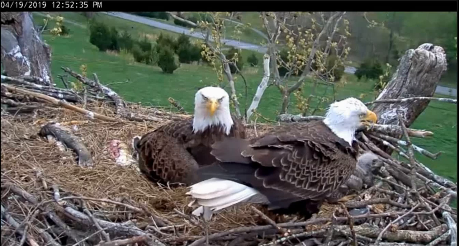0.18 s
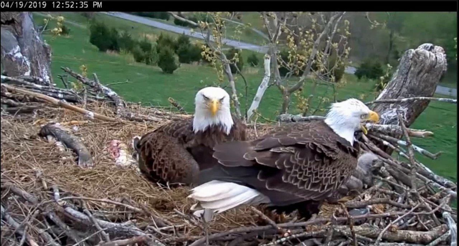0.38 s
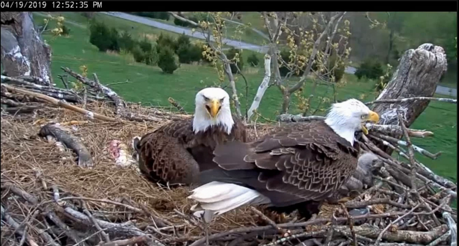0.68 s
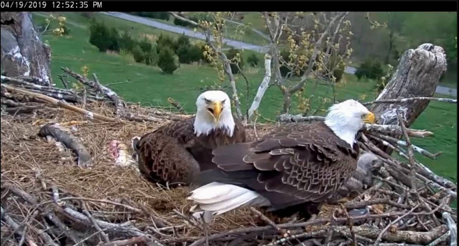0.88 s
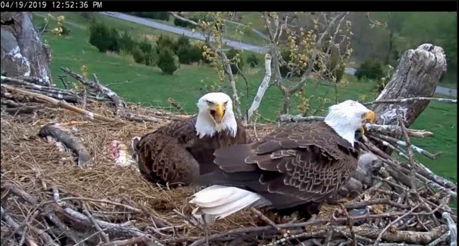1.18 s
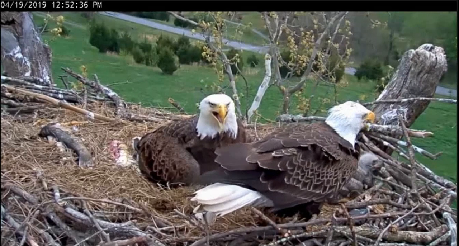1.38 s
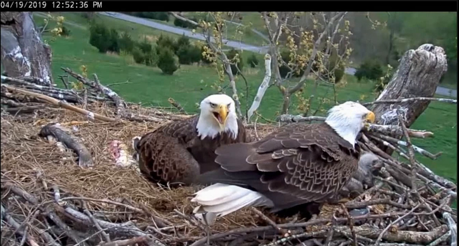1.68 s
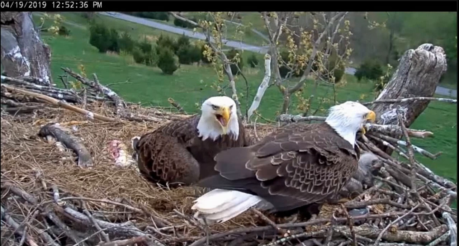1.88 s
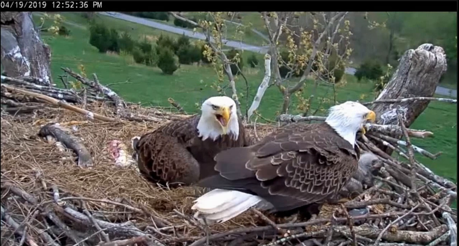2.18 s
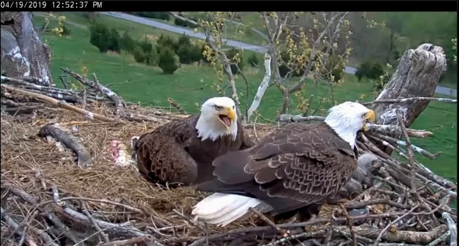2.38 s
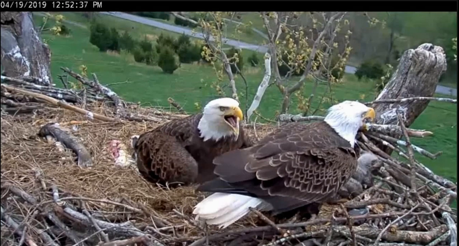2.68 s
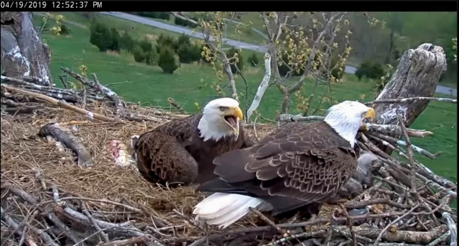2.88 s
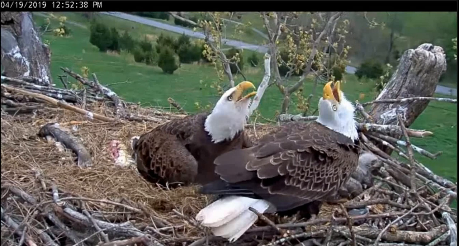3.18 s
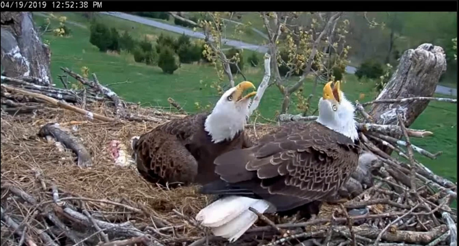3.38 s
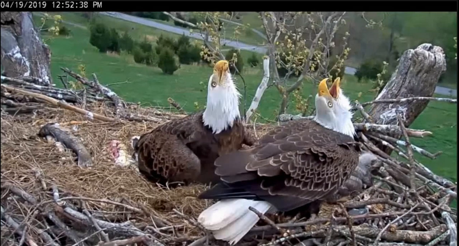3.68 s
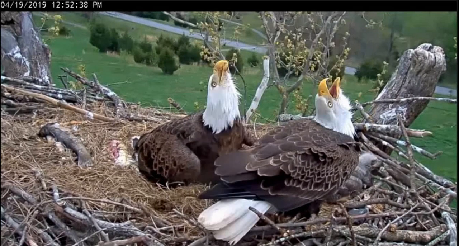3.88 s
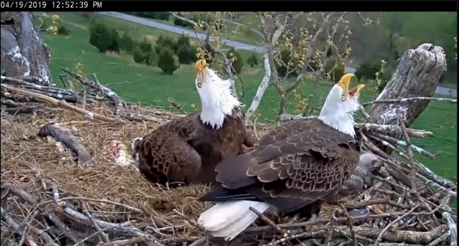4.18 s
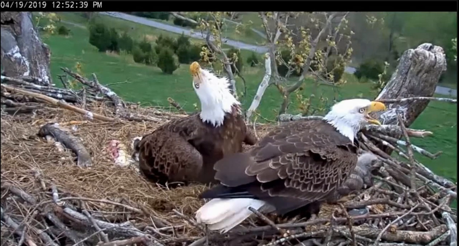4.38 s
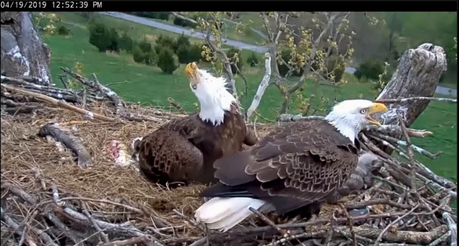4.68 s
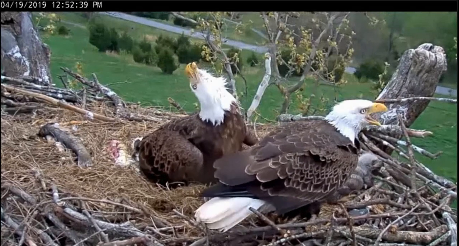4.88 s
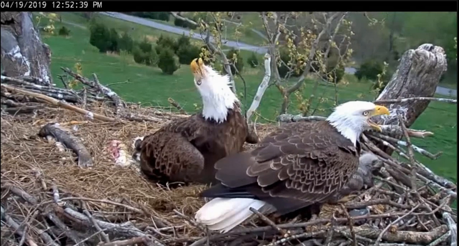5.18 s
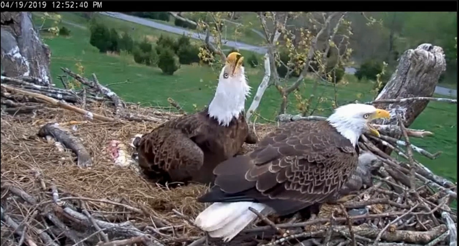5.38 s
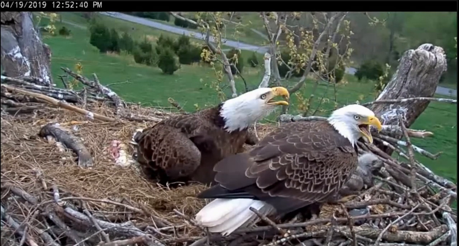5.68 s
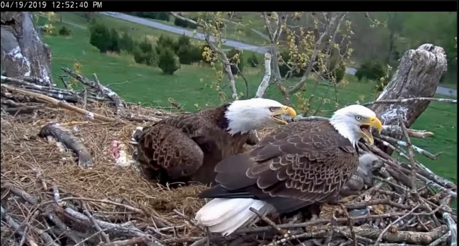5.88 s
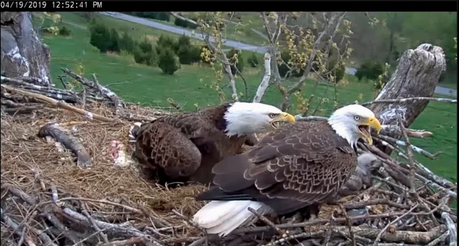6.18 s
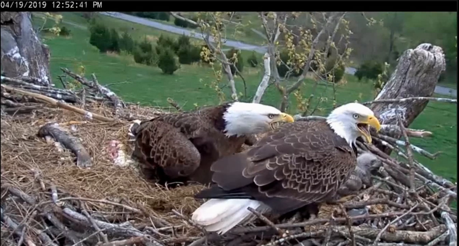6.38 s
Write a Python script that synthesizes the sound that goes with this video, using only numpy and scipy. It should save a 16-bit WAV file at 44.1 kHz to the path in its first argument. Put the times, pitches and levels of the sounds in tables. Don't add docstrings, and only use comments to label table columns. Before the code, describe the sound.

High, trembling eagle whistles and squeaky chirp runs over thudding wind on an outdoor microphone, with a small songbird whistling faintly far off.

```python
import sys
import numpy as np
from scipy import signal
from scipy.fft import rfft, irfft
from scipy.io import wavfile
from scipy.ndimage import uniform_filter1d

SR = 44100
rng = np.random.default_rng(int(sys.argv[2]) if len(sys.argv) > 2 else 0)


def boost(x):
    u = np.asarray(x, float) / 20
    return 10 ** u


def wrap_up_sound(samples):
    columns = np.atleast_2d(samples).T
    tamed = np.clip(columns, -1, 1)
    steps = np.round(tamed * 32767).astype(np.int16)
    wavfile.write(sys.argv[1], SR, steps)


N = 289296


def evened(x):
    return x / np.sqrt(np.mean(abs(x) ** 2) + 1e-20)


def add(mix, s, sound):
    part = mix[round(s * SR):][:len(sound)]
    part += sound[:len(part)]


def wobble(count, width_hz):
    r = np.exp(-np.pi * width_hz / SR)
    z = rng.standard_normal(count + 900) + 1j * rng.standard_normal(count + 900)
    for _ in range(3):
        z = signal.lfilter([1], [1, -r], z)
    return evened(z[900:])


def note(rows, rough, width_hz, climb, rattle):
    s, hz, *levels_db = np.transpose(rows)
    t = np.arange(s[0], s[-1], 1 / SR)
    smooth_hz = uniform_filter1d(np.interp(t, s, hz), size=400)
    turn = 2 * np.pi * np.cumsum(smooth_hz) / SR
    sound = np.zeros(len(t))
    for k, db in enumerate(levels_db, 1):
        share = np.clip(rough * k ** climb, 0, .9)
        shake = np.sqrt(1 - share ** 2) + share * wobble(len(t), width_hz * k ** .3)
        sound += np.sqrt(2) * boost(np.interp(t, s, db)) * (shake * np.exp(1j * k * turn)).real
    sound *= np.sqrt(1 - rattle ** 2) + rattle * wobble(len(t), 300).real * np.sqrt(2)
    return s[0], sound * signal.windows.tukey(len(t), min(1, .012 * SR / len(t)))


def sing(notes, **membrane):
    out = np.zeros(N)
    for rows in notes:
        add(out, *note(rows, **membrane))
    return out


def shaped(fade_db, s, length, start_hz, end_hz, *levels_db):
    db = np.array(levels_db)
    end = s + length
    middle_hz = .503 * (start_hz + end_hz)
    return [(s - .014, start_hz, *(db - 35)),
            (s - .001, start_hz, *(db - 23.0)),
            (s + 0.0038, start_hz, *(db + 1.0)),
            (s + 0.5 * length + 0.0027, middle_hz, *(db + 0.5 + 0.45 * fade_db)),
            (end - .002, .992 * end_hz, *(db - 3.5 + fade_db)),
            (end + 0.004, .985 * end_hz, *(db - 21.5)),
            (end + 0.029, .97 * end_hz, *(db - 30.0))]


def sing_short(rows, fade_db, rough, width_hz, rattle):
    notes = [shaped(fade_db, *row) for row in rows]
    return sing(notes, rough=rough, width_hz=width_hz, climb=.4, rattle=rattle)


def whistles():
    # (time [s], pitch [Hz], level [dB], second partial against the first [dB])
    whistle_tables = [
        [(.09, 2583, -43, 1), (.099, 2510, -24, -1), (.125, 2584, -19, -6.5), (.146, 2615, -21.5, -7),
         (.17, 2540, -23.5, -1.5), (.197, 2320, -24.5, -17), (.225, 2484, -19.5, -7), (.262, 2415, -28, -7),
         (.28, 2210, -59.5, 3)],
        [(.57, 2460, -37, -14), (.578, 2458, -21, -5.5), (.605, 2598, -20, -4.5), (.635, 2406, -25.5, -8.5),
         (.655, 2350, -39.5, -14.5), (.668, 2320, -55.5, 1)],
    ]
    notes = []
    for rows in whistle_tables:
        points = []
        for s, hz, db, bright_db in rows:
            third_db = db + 0.73 * bright_db - 17.5 - 0.0018 * max(hz - 2520, 0)
            points.append((s, hz, db, db + bright_db, third_db))
        notes.append(points)
    return sing(notes, rough=.21, width_hz=470, climb=1.05, rattle=.05)


def warble():
    # (time [s], pitch [Hz], level [dB], second partial against the first [dB])
    warble_points = [
        (6.028, 2540, -39, -1.5),
        (6.04, 2860, -30, -23),
        (6.066, 2840, -31, -8.5),
        (6.086, 2970, -27, -2.5),
        (6.117, 2904, -34.5, -7.5),
        (6.149, 2600, -62, 2),
    ]
    points = [(s, hz, db, db + bright_db) for s, hz, db, bright_db in warble_points]
    return sing([points], rough=.5, width_hz=380, climb=.4, rattle=.15)


def yelps():
    # (time [s], length [s], pitch [Hz], level [dB], third partial against the first [dB])
    yelp_rows = [
        (0.076, .022, 1556, -37, -4.5),
        (0.555, 0.019, 1534, -33, -19.5),
        (0.888, 0.014, 1518, -41.5, -6.5),
    ]
    rows = [(s, length, .92 * hz, 1.05 * hz, db, db + 0.5, db + third_db)
            for s, length, hz, db, third_db in yelp_rows]
    return sing_short(rows, fade_db=0, rough=.5, width_hz=450, rattle=.3)


def grunts_and_chups():
    # (time [s], length [s], pitch [Hz], level [dB], second partial against the first [dB])
    grunt_rows = [
        (1.206, 0.031, 1072, -38, -14),
        (1.455, 0.017, 1078, -42.5, -13),
        (4.719, 0.013, 2044, -36, -24.5),
    ]
    # (time [s], length [s], pitch [Hz], level [dB], third partial against the first [dB])
    chup_rows = [(1.218, 0.043, 2170, -39, -21), (1.582, 0.023, 2080, -40.5, -23),
                 (1.938, 0.041, 2174, -41, -14.5), (2.206, 0.041, 2204, -41.5, -8.5),
                 (2.45, 0.043, 2220, -43, -8.5), (4.814, 0.032, 2116, -42, -9),
                 (4.895, 0.028, 2140, -40, -7.5), (6.484, 0.027, 2160, -39.5, -26)]
    rows = [(s, length, hz, hz, db, db + second_db, db - 18)
            for s, length, hz, db, second_db in grunt_rows]
    rows += [(s, length, 1.06 * hz, .98 * hz, db, db - 9, db + third_db)
             for s, length, hz, db, third_db in chup_rows]
    return sing_short(rows, fade_db=-7, rough=.72, width_hz=620, rattle=.35)


def pips():
    # (time [s], length [s], start pitch [Hz], end pitch [Hz], level [dB])
    pip_rows = [
        (2.685, 0.027, 2570, 2610, -40.5),
        (2.931, 0.038, 2560, 2580, -40),
        (3.185, 0.023, 2650, 2610, -34.5),
        (3.203, 0.016, 2950, 2784, -35.5),
    ]
    rows = [(*row, row[-1] - 14.5) for row in pip_rows]
    return sing_short(rows, fade_db=-5, rough=.78, width_hz=800, rattle=.35)


def peeps():
    # (time [s], length [s], start pitch [Hz], end pitch [Hz], level [dB])
    peep_rows = [
        (.684, 0.031, 2475, 2490, -25.5),
        (0.899, 0.024, 2284, 2600, -24),
        (4.389, .065, 2433, 2166, -37.5),
    ]
    rows = [(*row, row[-1] - 13) for row in peep_rows]
    return sing_short(rows, fade_db=0, rough=.4, width_hz=430, rattle=.1)


def trills():
    # (time [s], length [s], pitch [Hz], level [dB], second partial against the first [dB])
    trill_tables = [
        [(4.388, 0.012, 2920, -29, -16), (4.407, 0.024, 2960, -58.5, 15), (4.466, 0.064, 2942, -31.5, -2.5),
         (4.572, 0.02, 2930, -30.5, -1.5), (4.591, 0.029, 2910, -44.5, 7), (4.685, 0.044, 2860, -29.5, -8),
         (4.732, 0.032, 2850, -51, 6), (4.797, 0.026, 2764, -35, -11.5), (4.898, 0.05, 2810, -58.5, 20.5),
         (5.985, 0.046, 2848, -30.5, -15)],
        [(6.159, 0.06, 2918, -31.5, -5), (6.262, 0.0065, 2990, -39, -14), (6.278, 0.039, 2910, -32, -7),
         (6.361, 0.039, 2793, -30.5, -10), (6.466, 0.016, 2735, -32.5, -11), (6.488, 0.017, 2660, -44.5, -21.5)],
    ]
    trill_glides = [
        55,
        -73,
    ]
    rows = []
    for table, glide_hz in zip(trill_tables, trill_glides):
        for s, length, hz, db, bright_db in table:
            rows.append((s, length, hz - glide_hz / 2, hz + glide_hz / 2, db, db + bright_db))
    return sing_short(rows, fade_db=-2, rough=.55, width_hz=430, rattle=.22)


def squeaks_and_wheezes():
    # (time [s], length [s], start pitch [Hz], end pitch [Hz], level [dB])
    squeak_rows = [(.405, 0.23, 4300, 4940, -47), (.42, 0.16, 6480, 7630, -62.5),
                   (.5, 0.14, 4300, 4480, -49.5), (.67, 0.02, 5930, 7270, -32),
                   (.712, 0.03, 4942, 4950, -38.5), (.895, 0.046, 3950, 3665, -44.5),
                   (1.446, 0.025, 4465, 4630, -33.5), (3.125, .02, 5040, 5260, -44.5),
                   (3.15, 0.059, 4700, 4710, -41), (3.239, 0.061, 4710, 4770, -39),
                   (3.34, 0.016, 4490, 4430, -34), (3.362, 0.014, 4490, 4340, -44),
                   (4.782, 0.059, 4420, 4800, -42.5), (4.896, 0.047, 4550, 4730, -28.5),
                   (5.021, 0.028, 4390, 4506, -21.5), (5.073, 0.036, 4420, 4440, -48.5),
                   (5.153, 0.023, 4290, 4440, -30)]
    # (time [s], length [s], pitch [Hz], level [dB])
    wheeze_rows = [(0.079, 0.035, 6820, -45), (0.566, 0.071, 6750, -46.5), (0.603, 0.051, 6590, -50.5),
                   (0.687, 0.014, 6840, -38.5), (0.698, 0.034, 6580, -58), (0.891, 0.051, 6550, -53),
                   (1.083, 0.035, 6230, -51), (3.142, 0.042, 6415, -53.5), (3.196, .1, 5800, -48),
                   (3.343, 0.047, 5550, -55), (4.373, .088, 7080, -54), (4.783, .06, 6440, -59),
                   (4.889, 0.049, 6510, -42), (5.977, 0.032, 6780, -50.5), (0.068, 0.034, 2040, -48),
                   (0.55, 0.026, 2040, -44), (4.378, 0.06, 5930, -46.5), (4.389, .012, 5300, -43),
                   (4.383, 0.017, 1785, -53), (5.923, 0.029, 3780, -63), (5.985, 0.04, 3560, -53),
                   (6.15, 0.073, 3570, -56.5), (6.247, 0.072, 4330, -62.5), (6.334, .07, 3690, -64),
                   (6.448, 0.032, 4300, -68), (6.447, 0.038, 3590, -66)]
    rows = squeak_rows + [(s, length, hz, hz, db) for s, length, hz, db in wheeze_rows]
    return sing_short(rows, fade_db=-1, rough=.7, width_hz=540, rattle=.3)


def eagles():
    clear = whistles() + warble() + yelps()
    hoarse = grunts_and_chups() + squeaks_and_wheezes()
    return clear + hoarse + pips() + peeps() + trills()


def noise_bursts(rows, spread):
    out = np.zeros(N)
    for s, length, db, centre_hz in rows:
        u = np.linspace(0, 1.3, round(1.3 * length * SR))
        grains = rng.standard_normal(len(u)) * (0.4 + 0.46 * abs(wobble(len(u), 140)))
        grains *= boost(1.9 * wobble(len(u), 40).real)
        edges_hz = [centre_hz / spread, min(spread * centre_hz, 6900)]
        band = signal.butter(3, edges_hz, "band", fs=SR, output="sos")
        swell = np.sin(np.pi * (u / 1.3) ** .55) ** 1.3
        add(out, s, boost(db - 0.5) * evened(signal.sosfilt(band, grains)) * swell)
    return out


def puffs():
    # (time [s], level [dB])
    puff_rows = [(2.679, -49), (4.586, -46.5), (5.01, -50.5), (5.135, -52.5), (5.273, -60), (6.155, -45),
                 (6.264, -49), (6.355, -45.5)]
    return noise_bursts([(s, 0.047, db, 2320) for s, db in puff_rows], spread=1.25)


def hisses():
    # (time [s], length [s], level [dB], centre [Hz])
    hiss_rows = [(1.54, 0.074, -50.5, 6700), (1.55, 0.074, -51.5, 4800), (1.53, .06, -56, 6450),
                 (1.565, .03, -46.5, 3550), (1.54, 0.045, -59.5, 7300), (1.929, .09, -53, 5450),
                 (1.979, .05, -48, 6550), (1.995, 0.023, -50.5, 4400), (2, .035, -52, 3500),
                 (2.456, .03, -55.5, 5500), (2.681, 0.058, -53.5, 5100), (2.708, .05, -63, 6950),
                 (2.928, 0.039, -51.5, 5300), (2.923, .04, -61.5, 5500), (4.408, 0.07, -50.5, 4640),
                 (4.775, .065, -44.5, 4200), (4.797, .06, -44, 5300), (4.886, 0.082, -44.5, 3800),
                 (4.891, .055, -41.5, 5600), (.12, .09, -53, 7320), (0.25, 0.045, -54.5, 7250),
                 (3.168, 0.099, -56, 6300), (3.21, 0.047, -53.5, 3100), (4.515, 0.037, -49.5, 2900),
                 (6.394, 0.034, -50, 2900), (6.034, 0.039, -47, 5550), (5.2, 0.15, -59, 4550),
                 (5.968, 0.024, -48, 2650), (.685, .04, -41, 5000), (.56, .08, -51, 7450),
                 (7.8, .05, -57, 4800), (9.1, 0.045, -55, 4650), (11, 0.056, -56, 3000),
                 (6.32, .1, -66, 3650), (4.735, .02, -45, 2900), (5.9, .05, -54.5, 4900),
                 (1.47, .08, -51, 6700), (3.25, .06, -51.5, 3700), (4.95, .04, -53.5, 4600),
                 (3.37, 0.045, -53, 4600), (3.14, 0.065, -49, 5600), (3.2, .06, -51, 6350),
                 (2.452, 0.014, -45, 2620), (2.5, .018, -54, 2400), (6.464, 0.013, -43, 2300),
                 (6.14, .03, -50, 5400), (7.1, .08, -54, 2070), (1.2, .04, -54, 5300),
                 (1.1, 0.091, -58.5, 5600)]
    return noise_bursts(hiss_rows, spread=1.09)


def rustles():
    # (time [s], length [s], level [dB], centre [Hz])
    rustle_rows = [(0.861, 0.3, -57.5, 1160), (0.928, 0.24, -47.5, 2850), (0.849, 0.24, -45.5, 475),
                   (1.2, 0.045, -42.5, 590), (1.194, 0.023, -40, 3840), (1.206, 0.059, -51.5, 4400),
                   (1.213, 0.16, -53, 1720), (1.461, 0.16, -47.5, 4000), (1.512, 0.2, -56, 1700),
                   (1.412, 0.29, -51, 520), (0.643, 0.038, -46.5, 6200), (1.945, 0.087, -51, 4500),
                   (1.998, 0.054, -50, 2850), (2.208, 0.052, -63.5, 5960), (2.255, 0.018, -51, 1380),
                   (2.51, 0.021, -52.5, 1410), (2.751, 0.027, -55.5, 1400), (3.0, .025, -56, 1400),
                   (2.941, 0.036, -53.5, 4540), (3.131, 0.13, -51, 5250), (3.135, 0.19, -49.5, 2130),
                   (3.378, 0.033, -62.5, 4500), (4.314, 0.075, -59, 5580), (4.781, 0.06, -53.5, 4600),
                   (5.927, 0.056, -59.5, 6480), (5.959, 0.044, -54.5, 5460)]
    return noise_bursts(rustle_rows, spread=1.8)


def hollowed(x):
    # (centre [Hz], width [Hz], level change [dB])
    gaps = [(5050, 110, -26), (6040, 100, -26), (7050, 130, -14), (4050, 90, -8), (3150, 80, -6)]
    hz = np.fft.rfftfreq(N, 1 / SR)
    gain_db = sum(db * np.exp(-((hz - f) / width) ** 2) for f, width, db in gaps)
    return irfft(rfft(x) * boost(gain_db), N)


def songbird():
    # (time [s], length [s], start pitch [Hz], level [dB])
    high_voice = [(1.692, 0.23, 3884, -67), (2.032, 0.4, 3860, -71), (2.271, 0.31, 3780, -62),
                  (2.598, 0.093, 3770, -53), (2.748, 0.1, 3715, -64), (2.94, 0.21, 3710, -56.5),
                  (3.217, 0.12, 3695, -51.5), (3.418, 0.11, 3684, -52)]
    # (time [s], length [s], start pitch [Hz], glide [Hz], level [dB])
    low_voice = [
        (2.323, 0.28, 3520, -95, -58.5),
        (2.636, 0.32, 3380, 73.5, -60),
        (2.983, 0.23, 3410, 40.5, -54),
        (3.253, 0.19, 3320, 97.5, -53),
        (3.516, .25, 3333, 347, -53.5),
        (3.669, 0.18, 3220, 464.5, -55.5),
    ]
    # (time [s], level [dB])
    run = [(3.9, -57), (4.002, -56.5), (4.089, -59), (4.156, -54), (4.248, -53.5), (4.332, -56.5),
           (4.43, -53.5), (4.515, -54.5), (4.572, -51.5), (4.635, -53), (4.733, -53.5)]
    song = [(s, length, hz, -68.5, db) for s, length, hz, db in high_voice] + low_voice
    for s, db in run:
        start_hz = 3310 + 56 * (s - run[0][0])
        song.append((s, 0.098, start_hz, 458 * rng.uniform(0.68, 1.2), db))
    out = np.zeros(N)
    for s, length, start_hz, glide_hz, db in song:
        u = np.linspace(0, 1, round(length * SR))
        hz = start_hz + glide_hz * (1 - (1 - u) ** 2.0)
        tone = np.sqrt(2) * np.sin(2 * np.pi * np.cumsum(hz) / SR)
        add(out, s, boost(db) * tone * signal.windows.tukey(len(u), .4))
    return out


def field(x, t60):
    at = np.arange(300, SR // 2, 20)
    taps = np.zeros(SR // 2 + 20)
    signs = rng.choice([-1., 1.], len(at))
    taps[at + rng.integers(0, 20, len(at))] = signs * boost(-60 * at / SR / t60)
    return signal.fftconvolve(x, taps / np.linalg.norm(taps))[:N]


def read(points, hz):
    f, value = np.transpose(points)
    return np.interp(np.log(hz + 1), np.log(f + 1), value)


def noise(colour, patchy_db):
    hz = np.fft.rfftfreq(2048, 1 / SR)
    a, b, patches = rng.standard_normal((N // 512 + 5, 1025, 3)).T
    patches = uniform_filter1d(patches, size=6, axis=0)
    patches = evened(uniform_filter1d(patches, size=3, axis=1))
    z = (a + 1j * b) * boost(read(colour, hz)[:, None] + patchy_db * patches)
    return evened(signal.istft(z, nperseg=2048, noverlap=1536)[1][:N])


def wind():
    # (time [s], strength [dB], turbulence [dB])
    slow_wind = [(0, -19, -1), (.16, -26.5, -4), (.55, -17.5, -6.5), (.78, -27, -7.5), (1.0, -21, 2.5),
                 (1.3, -30, 6.5), (1.83, -26.5, -8.5), (2.28, -23, 0.5), (2.42, -28, 6), (3.102, -18, 0),
                 (3.9, -23.5, -1), (4.05, -32, -19.5), (4.6, -29.5, -6), (4.72, -23, 0), (5.1, -14, -6),
                 (5.4, -24, -1.5), (5.85, -24.5, -3.5), (6.56, -14, 3)]
    # (time [s], thud [dB], flutter [dB])
    buffets = [(0.553, 5, 8), (0.861, 1, 13.5), (0.951, -3, -4), (1.0, 5.5, -1), (1.513, 7, 14.5),
               (2.043, 0.5, 11.5), (2.279, 8, 4), (2.41, -5.5, -23.5), (2.6, 0, 3.5), (2.679, 7.5, 8),
               (2.81, 2, 2), (2.869, 3.5, 4), (3.03, 7.5, 1), (3.14, -1, -7), (3.193, 7, 11.5),
               (3.429, 4.5, 1.5), (3.561, -2, -2), (3.62, -3, -8), (3.66, 3, 1.5), (3.869, 2.5, 5),
               (4.181, 6, 2), (4.372, 3.5, 16), (4.749, 10.5, 9.5), (4.97, 3.5, 8), (5.329, 2, 3.5),
               (5.579, 7, 6), (5.79, 1.5, 0.5), (5.987, 8, 7.5), (6.1, 3, -5.5), (6.249, 3.5, 8)]
    # (frequency [Hz], level [dB per Hz])
    thud_colour = [(8, -26), (14, 0.5), (32, 10), (54, -0.5), (100, -4), (150, -13.5), (230, -40),
                   (400, -67)]
    # (frequency [Hz], level [dB per Hz])
    flutter_colour = [(40, -41.5), (100, -9), (160, 3.5), (250, -2.5), (400, -15.5), (700, -29),
                      (1200, -41.5), (2500, -55.5)]
    t = np.arange(N) / SR
    s, strength_db, turbulence_db = np.transpose(slow_wind)
    strength_db = np.interp(t, s, strength_db)
    turbulence_db = np.interp(t, s, turbulence_db)
    s, thud_db, flutter_db = np.transpose(buffets)
    bumps = np.exp(-((t[::64, None] - s) / 0.036) ** 2)
    thud_db = np.repeat(bumps @ thud_db, 64)[:N]
    flutter_db = np.repeat(bumps @ flutter_db, 64)[:N]
    lumps = boost(5 * np.tanh(.8 * wobble(N, 36).real))
    thud = boost(strength_db + thud_db) * noise(thud_colour, 1.0)
    flutter_db = flutter_db - 42.5 + 1.92 * (strength_db + 24.5) + turbulence_db
    flutter = boost(flutter_db) * evened(lumps * noise(flutter_colour, 1.9))
    limit = .36
    return limit * np.tanh((thud + flutter) / limit)


def leaves():
    # (frequency [Hz], level [dB per Hz])
    air_colour = [(120, -35.5), (200, -5), (400, -16.5), (600, -20.5), (1200, -26), (3000, -30.5),
                  (4400, -30), (5600, -32.5), (6700, -30.5), (7300, -53), (9000, -102)]
    # (time [s], level [dB])
    breeze = [(0, 5.5), (0.803, 8.5), (1.702, 3.5), (2.399, 3.5), (3.3, 4), (3.6, 2.5), (4.3, 1.5),
              (4.9, 8.5), (5.6, 2), (6.56, 10.5)]
    s, breeze_db = np.transpose(breeze)
    breeze_db = np.interp(np.arange(N) / SR, s, breeze_db)
    air = boost(-58 + breeze_db) * noise(air_colour, 1.8)
    return .35 * air + .65 * hollowed(air)


def scene():
    birds = eagles() + hollowed(rustles() + puffs() + hisses())
    song = songbird()
    far = song + boost(-3) * field(song, .6)
    far *= .75 + .55 * wobble(N, 200).real
    echoes = field(birds, 1.1) * (.7 + .7 * wobble(N, 250).real)
    return (birds + boost(-27.0) * echoes + far + wind() + leaves())[None]


def covered_bands(x):
    # (centre [Hz], width [Hz], level change [dB])
    notches = [(4160, 290, -2.5), (5063, 28, -6), (6120, 28, -10.5)]
    mask_db, spread_db, chance_db, hearing_db, grain_db = 31.5, 6.5, 5.5, -101, -24
    size, hop = 5644, 2822
    window = np.sin(np.pi * (np.arange(size) + .5) / size)
    hz, t, z = signal.stft(x, SR, nperseg=size, noverlap=hop, window=window)
    dips_db = sum(db * np.exp(-((hz - f) / width) ** 2) for f, width, db in notches)
    z = z * boost(dips_db)[:, None]
    band = (np.log(np.maximum(hz, 800) / 800) * 22).astype(int)
    count = band.max() + 1
    power_db = 10 * np.log10([np.mean(abs(z[band == k]) ** 2, 0) + 1e-20 for k in range(count)])
    octave = np.arange(count)[:, None] / 22 / np.log(2) - np.log2(5)
    bar_db = power_db[12:].max(0) - mask_db + spread_db * octave
    bar_db = np.maximum(bar_db, hearing_db + 22 * (octave > .78))
    luck_db = evened(uniform_filter1d(rng.standard_normal(power_db.shape), size=2, axis=1))
    keep = power_db + chance_db * luck_db > bar_db
    keep = keep | (np.arange(count) < 3)[:, None]
    grain = rng.standard_normal(z.shape) + 1j * rng.standard_normal(z.shape)
    z = z + boost(power_db[band] + grain_db) * grain * (band > 0)[:, None]
    return signal.istft(z * keep[band], SR, nperseg=size, noverlap=hop, window=window)[1][:N]


def overload(x):
    knee, ceiling = .38, .45
    x = x + .007
    over = np.maximum(abs(x) - knee, 0) * np.sign(x)
    return x - over + (ceiling - knee) * np.tanh(over / (ceiling - knee))


def band_limit(x):
    return signal.sosfilt(signal.butter(12, 7590, fs=SR, output="sos"), x)


def record(dry):
    treble_limit = signal.firwin(511, 7660, window=("kaiser", 9), fs=SR)
    x = signal.oaconvolve(dry[0], treble_limit, "same")
    x = overload(covered_bands(x))
    x = x * np.minimum(np.arange(N) / 300, 1)
    return band_limit(x[None])


dry = scene()
out = record(dry)
wrap_up_sound(out)
```